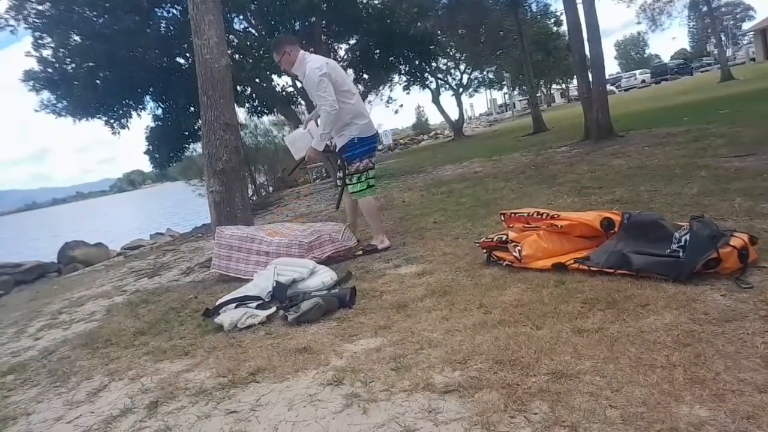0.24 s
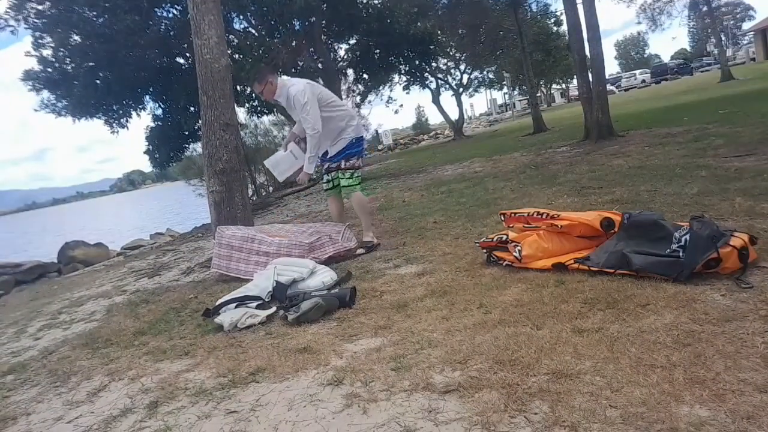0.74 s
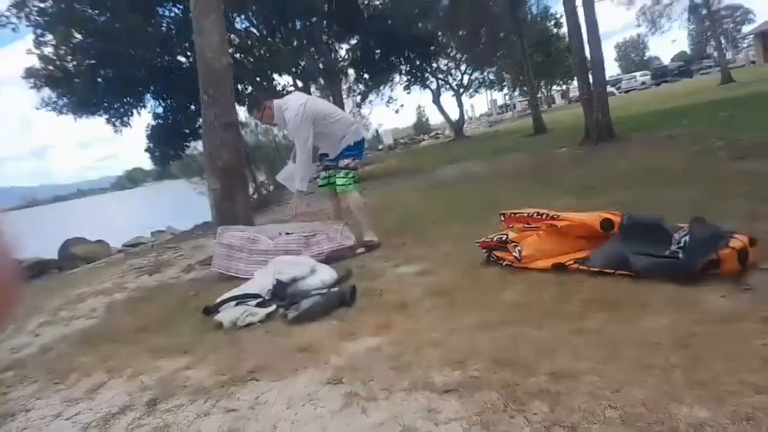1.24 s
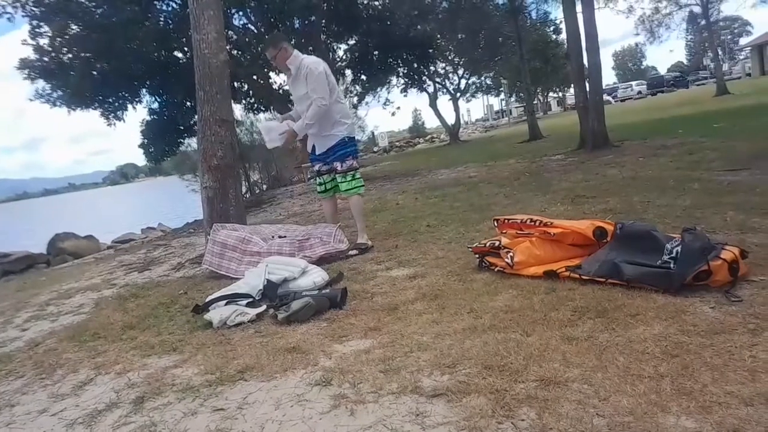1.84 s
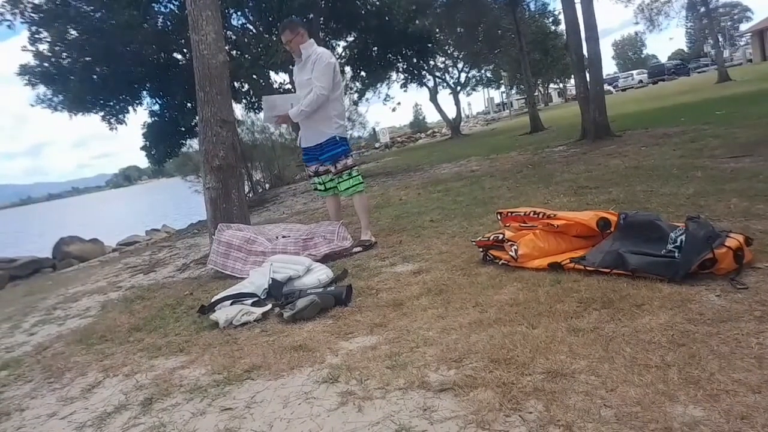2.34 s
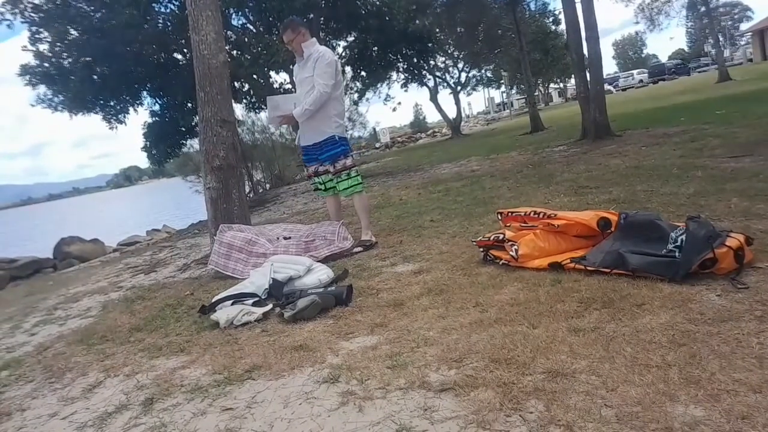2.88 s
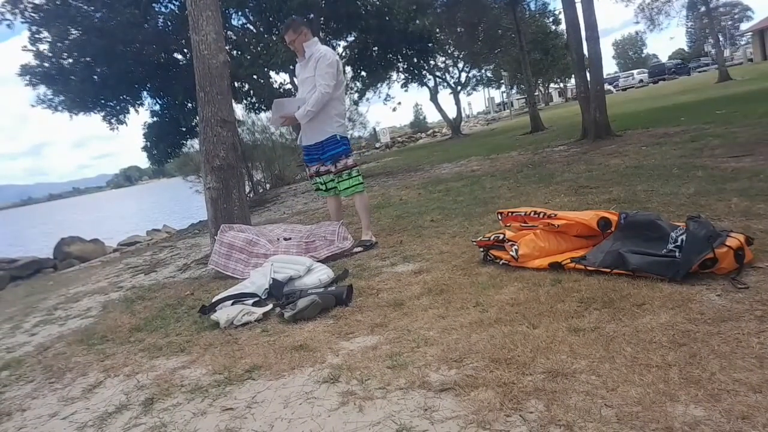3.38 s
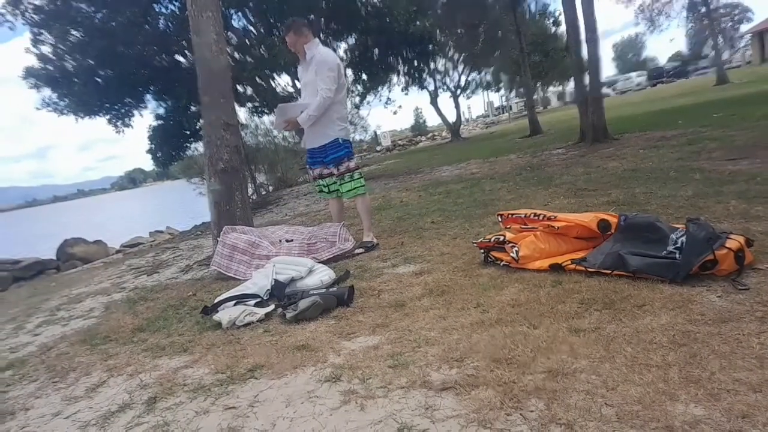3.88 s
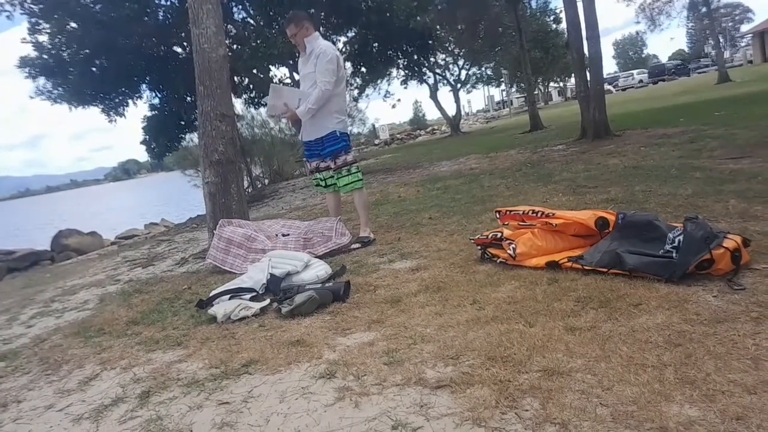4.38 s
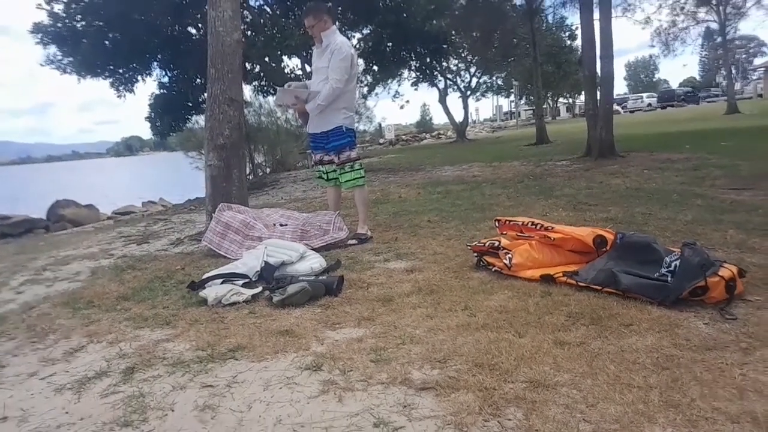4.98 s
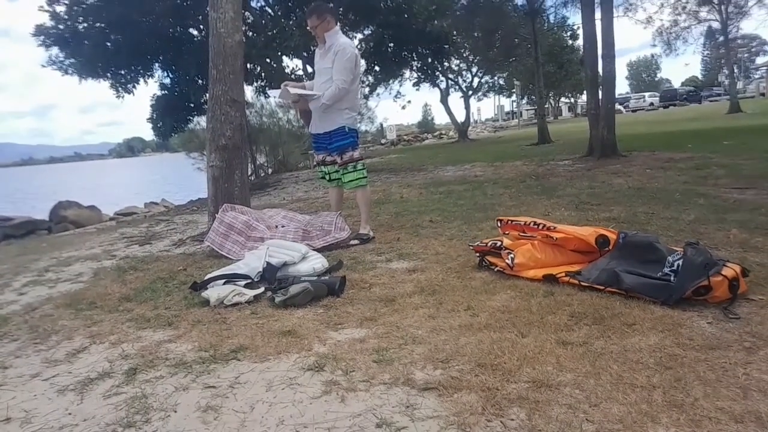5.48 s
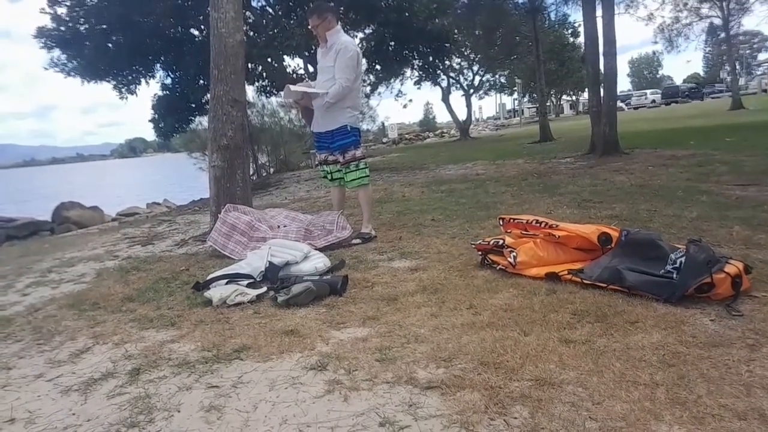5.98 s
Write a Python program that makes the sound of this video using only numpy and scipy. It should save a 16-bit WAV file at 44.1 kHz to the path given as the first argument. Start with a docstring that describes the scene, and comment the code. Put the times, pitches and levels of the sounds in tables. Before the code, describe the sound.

Close handling noise, with plastic clicks, thumps and one harsh scrape, over a quiet breezy riverbank with a chirping bird.

```python
"""Close knocks, clicks and rubs of a small camera being gripped and shifted on a grassy riverbank.
The plastic case cracks, rings and thumps right at its two microphone ports; skin sticks and slips
across it, and one hard scrape overloads the microphones. Behind the handling a bird repeats a rising
chirp in the trees, over light wind, hissing leaves, the wash of the river and the far hum of the shore."""
import sys
import numpy as np
from scipy import signal
from scipy.fft import rfft, irfft
from scipy.io import wavfile
from scipy.ndimage import uniform_filter1d

SR = 44100
rng = np.random.default_rng(int(sys.argv[2]) if len(sys.argv) > 2 else 0)


def bounce(signal):
    """Save signal as a 16-bit WAV file at the path given by the first command-line argument."""
    frames = np.transpose(np.atleast_2d(signal))
    limited = np.clip(frames, -1, 1)
    pcm = np.round(limited * 32767).astype(np.int16)
    wavfile.write(sys.argv[1], SR, pcm)


N = 274417
TIME = np.arange(N) / SR
HZ = np.fft.rfftfreq(N, 1 / SR)

# colour of the open air: f/Hz, level/dB
AIR_COLOUR = [(15, -56.5), (25, -20), (53, -0.5), (70, -4), (180, -15), (206, -18), (301, -13.5),
              (516, -13.5), (1160, -30), (1370, -28), (1790, -26), (2840, -24), (3080, -33), (3340, -24.5),
              (16000, -28.5)]
# how alike the ambience is at the two ports: f/Hz, correlation
AIR_LIKENESS = [(40, 0.74), (120, 0.95), (400, 0.9), (1000, 0.18), (2500, .25), (12000, 0.6)]
# level of the background hum, which ducks after the loud scrape and swells later: t/s, level/dB
BACKGROUND_LEVEL = [(0.0, -58), (0.36, -63.5), (1.23, -63.5), (1.33, -67), (3.69, -63.5), (3.88, -56),
                    (4.05, -50), (4.28, -57.5), (6.22, -53.5)]
# the case flexes the two ports differently: f/Hz, lead of the left port/rad
CASE_PHASE = [(40, 0.5), (90, -1), (200, -2.5), (400, 1.6), (700, 1.68), (1200, -1.33), (2500, -2.5),
              (4500, -1), (8000, -12)]


def gain_of(db):
    return 10 ** (np.asarray(db) / 20)


def unit_rms(x):
    return x / np.sqrt(np.mean(x ** 2) + 1e-20)


def as_blow(x):
    """Scales a short sound to the energy of 10 ms at level 1."""
    return x / np.sqrt(np.sum(x ** 2, -1, keepdims=True) / (SR / 100) + 1e-20)


def curve_at(points, hz):
    """Reads a curve along a logarithmic frequency axis."""
    f, value = np.transpose(points)
    return np.interp(np.log(hz + 1), np.log(f + 1), value)


def add(mix, start_s, sound):
    part = mix[..., max(round(start_s * SR), 0):][..., :sound.shape[-1]]
    part += sound[..., :part.shape[-1]]


def panned(side_db):
    """Left and right gains of mean power 1; positive leans left."""
    return unit_rms(gain_of([[side_db / 2], [-side_db / 2]]))


def below(hz, edge_hz, order=6):
    """Gain of a low-pass."""
    return 1 / np.sqrt(1 + (hz / edge_hz) ** (2 * order))


def above(hz, edge_hz, order=6):
    """Gain of the matching high-pass."""
    return np.sqrt(1 - below(hz, edge_hz, order) ** 2)


def wander(rate_hz, count=N):
    """Slow random drift of rms 1."""
    hz = np.fft.rfftfreq(count, 1 / SR)
    return unit_rms(irfft(rfft(rng.standard_normal(count)) * below(hz, rate_hz, order=2), count))


def tremble(samples, count):
    """Fast random unsteadiness: noise averaged over a few samples."""
    return unit_rms(uniform_filter1d(rng.standard_normal(SR // 2), samples))[:count]


def ports(pair, likeness, phase=0):
    """Partly alike spectra at the two ports, from two unrelated signals."""
    left, other = rfft(pair)
    right = likeness * left + np.sqrt(1 - likeness ** 2) * other
    return np.array([left, right * np.exp(-1j * phase)])


def patchy(x, depth_db, bins, frames=12):
    """Broad resonances come and go at random, alike at both ports."""
    spectra = signal.stft(x, nperseg=1024, noverlap=768)[2]
    patches = rng.standard_normal(spectra.shape[1:])
    for _ in range(2):
        patches = uniform_filter1d(uniform_filter1d(patches, bins, axis=0), frames, axis=1)
    spectra = spectra * gain_of(depth_db * unit_rms(patches))
    return signal.istft(spectra, nperseg=1024, noverlap=768)[1][:, :x.shape[-1]]


def background_swell():
    """How far the background level stands above its mean, in dB."""
    db = np.interp(TIME, *np.transpose(BACKGROUND_LEVEL))
    return db - db.mean()


def open_air(band):
    """One band of outdoor noise, spread across the stereo field."""
    # lean of the ambience: f/Hz, left minus right/dB
    balance = [(60, -15.5), (400, 2.5), (1200, -3), (3000, 18.5), (7000, 7), (14000, -3.5)]
    spectra = ports(rng.standard_normal((2, N)), curve_at(AIR_LIKENESS, HZ))
    colour_db = curve_at(AIR_COLOUR, HZ) + curve_at(balance, HZ) * np.array([[0.5], [-0.5]])
    return unit_rms(irfft(spectra * gain_of(colour_db) * band, N))


def shore_hum(lift_db=2.5, flicker_db=1.2):
    """The far shore: flickering low-mid noise, played at the background level."""
    hum = open_air(above(HZ, 200, order=2) * below(HZ, 990, order=2))
    background_db = np.interp(TIME, *np.transpose(BACKGROUND_LEVEL))
    return hum * gain_of(background_db + lift_db + flicker_db * wander(rate_hz=24))


def leaves(level_db=-67, follows=0.32):
    """A fine hiss of leaves that partly follows the background level."""
    return open_air(above(HZ, 2400, order=4)) * gain_of(level_db + follows * background_swell())


def bump_and_wind(breeze_db=-59, follows=0.76, lumps_db=3.7, surge_s=0.015):
    """Rumble at the ports: a bump of the case dies away, then a lumpy breeze blows with short puffs."""
    # a low bump of the case dying away at the start, then short puffs of wind: t/s, level/dB
    peaks = [(.005, -37), (.69, -48), (3.03, -51.5), (3.29, -51), (4.971, -35), (5.863, -41.5),
             (5.916, -39.5)]
    spectra = ports(rng.standard_normal((2, N)), likeness=0.33) * gain_of(curve_at(AIR_COLOUR, HZ))
    rumble = unit_rms(irfft(spectra * below(HZ, 130, order=2) * above(HZ, 30, order=2), N))
    breeze = gain_of(breeze_db + follows * background_swell() + lumps_db * wander(rate_hz=9.2))
    surges = sum(gain_of(db) / (1 + ((TIME - s) / surge_s) ** 2) ** 2 for s, db in peaks)
    return rumble * (breeze + surges)


def river(level_db=-64.5, period_s=2, crest_s=0.55, depth_db=3, follows=0.19):
    """Small waves make a patchy midrange wash that swells slowly and evenly."""
    ripples = patchy(rng.standard_normal((2, N)), depth_db=3.5, bins=4)
    spectra = ports(ripples, curve_at(AIR_LIKENESS, HZ))
    wash = unit_rms(irfft(spectra * above(HZ, 1000, order=3) * below(HZ, 1450, order=5), N))
    waves = np.cos(2 * np.pi * (TIME - crest_s) / period_s)
    return wash * gain_of(level_db + depth_db * waves + follows * background_swell())


def among_trees(direct, send, echoes_per_s=2500, build_s=0.0056):
    """A call from the left, plus the soft tail that trunks and leaves scatter from it."""
    # decay among the trees: f/Hz, t60/s
    decay = [(500, .4), (3000, 0.2), (6000, 0.65), (11000, 1)]
    echoes = rng.standard_normal((2, SR)) * (rng.random((2, SR)) < echoes_per_s / SR)
    hz, t, spectra = signal.stft(echoes, SR, nperseg=256)
    envelope = gain_of(-60 * t / curve_at(decay, hz)[:, None]) * (1 - np.exp(-t / build_s))
    tail = signal.istft(spectra * envelope, SR)[1]
    reverb = signal.fftconvolve(send[None], tail / np.linalg.norm(tail[0]), axes=1)[:, :N]
    return direct * panned(side_db=12) + reverb * panned(side_db=9)


def bird(direct_db=-4, facing=0.6, rasp=0.012, flutter_db=1.7, stop_s=0.002):
    """Raspy rising chirps of four harmonics, some broken off halfway; brighter ones arrive drier."""
    # calls: cue t/s, level/dB, pitch factor, overtone tilt/(dB/octave), cut-off after the cue/s
    chirps = [(.008, -53.5, 0.85, -14, 0.019), (.397, -50, 0.97, -3, .05), (0.459, -52.5, 0.9, -14, 0.029),
              (.686, -51.5, 0.83, -12, 0.02), (1.004, -49.5, 0.96, -0.5, 0.05),
              (1.693, -52.5, 0.98, -1, 0.046), (1.902, -56.5, 1, -6, 0.017), (2.341, -52.5, 1, -2, 0.057),
              (2.603, -62, 1.1, -6, .018), (2.959, -49.5, 0.94, -2, .05), (3.533, -51, 0.96, -2, 0.045),
              (4.043, -45, 1.01, 4.5, 0.048), (4.409, -55.5, .84, -4, 0.039), (4.659, -46, 1.02, 3, 0.058),
              (4.944, -62, 1.07, -5, .03), (5.215, -48, 0.93, -2, 0.051), (5.798, -47.5, 0.98, -5, .045),
              (5.945, -53.5, 0.97, -9.5, 0.02)]
    # shape of one chirp: t from the cue/s, f/Hz, level/dB
    gesture = [(-.02, 2380, -19), (-.009, 2650, -5), (0, 2760, 1.5), (.008, 3040, 5.5), (.02, 3640, -.5),
               (.03, 3800, 1.5), (.042, 3720, -9.5), (.052, 3350, -23)]
    # resonance of the beak: f/Hz, level/dB
    beak = [(2300, -15.5), (3000, -13), (3700, 0), (4700, -1.5), (5600, -1), (7000, -0.5), (7800, -6),
            (8500, -16.5), (9500, -32), (11200, -13), (14000, -34.5)]
    direct, send = np.zeros((2, N))
    at, pitch, shape_db = np.transpose(gesture)
    t = np.arange(at[0], at[-1], 1 / SR)
    for s, db, factor, tilt, end in chirps:
        hz = factor * np.interp(t, at, pitch) * (1 + rasp * tremble(50, len(t)))
        angle = 2 * np.pi * np.cumsum(hz) / SR
        voice = sum(gain_of(curve_at(beak, k * hz) + tilt * np.log2(k / 2)) * np.sin(k * angle)
                    for k in range(1, 5))
        gate = 0.5 - 0.5 * np.tanh((t - end) / stop_s)
        call = gain_of(db + np.interp(t, at, shape_db) + flutter_db * tremble(50, len(t))) * gate * voice
        add(send, s + at[0], call)
        add(direct, s + at[0], gain_of(direct_db + facing * tilt) * call)
    return among_trees(direct, send)


def wavering_tone(length_s, hz, waver, fall=0):
    """A short tone that swells and fades, its pitch unsteady and perhaps drooping."""
    t = np.arange(0, length_s, 1 / SR)
    pitch = hz * (1 - fall * (t / length_s) ** 2 + waver * tremble(120, len(t)))
    return np.sin(np.pi * t / length_s) * np.sin(2 * np.pi * np.cumsum(pitch) / SR)


def far_whistles():
    """A few faint tones carry through the trees."""
    # far tones: t/s, length/s, f/Hz, level/dB, waver/share of pitch, final fall/share of pitch
    whistles = [(0.121, 0.017, 1167, -46, 0.038, 0), (.655, 0.067, 3010, -57.5, 0.036, .08),
                (0.755, .12, 549.4, -52.5, 0.11, 0.023), (0.724, 0.097, 2600, -56, 0.081, 0.14),
                (2.729, 0.017, 1436, -54, .02, 0.017), (2.805, 0.014, 1507, -55, .023, 0.0099),
                (5.703, .048, 7700, -62, .005, 0.00083), (5.831, 0.39, 540, -54, 0.16, 0.003),
                (5.87, .094, 7700, -67, .005, 0), (6.102, 0.1, 7400, -64, 0.0094, 0.017)]
    out = np.zeros(N)
    for s, length, hz, db, waver, fall in whistles:
        add(out, s, gain_of(db) * wavering_tone(length, hz, waver, fall))
    return among_trees(direct=out, send=out)


def crack(tilt, side_db, fade_s, rattle_db, rattle_s):
    """A snap of plastic, different at each port: a sharp burst, then a rattle, weaker in bright snaps."""
    # colour of the snap: f/Hz, level/dB
    colour = [(500, -22.5), (1100, -4.5), (1700, -4.5), (2500, 1), (3300, -3), (4200, -1), (6000, -1.5),
              (9000, -7), (13000, -11), (16000, -16.5)]
    t, hz = np.arange(2048) / SR, np.fft.rfftfreq(2048, 1 / SR)
    rattle = gain_of(rattle_db - 0.8 * tilt - 2.5) * np.exp(-t / rattle_s)
    burst = rng.standard_normal((2, len(t))) * (np.exp(-t / fade_s) + rattle)
    colour_db = curve_at(colour, hz) + tilt * np.log2(np.maximum(hz, 1500) / 4000)
    log_gain = np.log(gain_of(np.r_[colour_db, colour_db[-2:0:-1]]))
    minimum_phase = np.exp(np.conj(signal.hilbert(log_gain)))[:len(hz)]  # keeps the attack sharp
    return as_blow(irfft(rfft(burst) * minimum_phase)) * panned(side_db)


def clicks():
    """The plastic snaps cleanly, with no ring or thump."""
    # clicks of the case: t/s, level/dB, tilt/(dB/octave), left minus right/dB
    snaps = [(0.3451, -56.5, -6.5, 10), (1.0789, -39.5, 0.5, 14), (1.2224, -15, -4, -8.5),
             (1.375, -55.5, 9, -4), (1.5038, -48, 3.5, 14), (1.556, -37, -1, 5), (1.5609, -38.5, 2.5, -3),
             (1.5763, -38, -1, -3), (1.6233, -38, 6, 0), (1.666, -44, 18, 2.5), (1.7, -51.5, 1, 12.5),
             (1.7674, -50, 6.5, 7), (1.79, -30.5, -12.5, 5.5), (1.8013, -18, 5, 3),
             (1.8193, -31.5, -6.5, 13), (1.851, -44.5, 2, 0), (1.9512, -47, -4, 1),
             (1.999, -41.5, 8.5, 5.5), (2.063, -52, -0.5, 10), (2.1096, -30.5, 1.5, 11),
             (2.1526, -28, 2.5, 13.5), (2.1707, -48, 2.5, -3.5), (3.9308, -27, -0.5, 2),
             (3.988, -42.5, 11, 9), (4.2934, -43, 12.5, -3), (4.3823, -50.5, 9.5, 6.5),
             (5.1478, -43, 1, -1), (5.5652, -35.5, 2, 0), (5.594, -32, 1, 17), (5.6472, -34, -10, -8)]
    out = np.zeros((2, N))
    for s, db, tilt, side_db in snaps:
        add(out, s, gain_of(db) * crack(tilt, side_db, fade_s=0.00071, rattle_db=-23, rattle_s=0.0047))
    return out


def finger_pressure(rise_s, hold_s, release_s):
    """One stroke builds, holds and dies away."""
    t = TIME[:SR // 2]
    return np.clip(t / rise_s, 0, 1) * np.exp(-np.maximum(t - rise_s - hold_s, 0) / release_s)


def friction(strokes, colour, release_s, slips_per_s, spread_db, smooth, side_db, judder_db, patchy_db):
    """Skin sticks and slips on the case: dense tiny clicks sound as rumble, body and hiss."""
    # how alike the rubbing is at the two ports: f/Hz, correlation
    likeness = [(60, 0.3), (250, 0.97), (500, 0.97), (1200, 0.7), (2200, 0.77), (12000, 0.36)]
    starts, rises, holds, db, rumble_db, hiss_db, tilt = np.transpose(strokes)
    count = SR * int(np.ceil(starts[-1] - starts[0]))
    hz, shape = np.fft.rfftfreq(count, 1 / SR), (2, count)
    sizes = gain_of(spread_db * np.minimum(rng.exponential(1, shape), 4)) * rng.choice([-1, 1], shape)
    slips = unit_rms(sizes * (rng.random(shape) < slips_per_s / SR))
    grain = patchy(slips + smooth * rng.standard_normal(shape), patchy_db, bins=9)
    grain = grain * gain_of(judder_db * wander(rate_hz=59, count=count))
    spectra = ports(grain, curve_at(likeness, hz), curve_at(CASE_PHASE, hz))
    spectra *= gain_of(curve_at(colour, hz))
    rumble = unit_rms(irfft(spectra * below(hz, 210, order=3) * above(hz, 48, order=3)))
    body = unit_rms(irfft(spectra * above(hz, 340, order=3) * below(hz, 1420, order=12)))
    hiss = unit_rms(irfft(spectra * above(hz, 1900)))
    low_hiss = irfft(rfft(hiss) * below(hz, 5900, order=2) ** 2)
    pressure = np.zeros((len(starts), count))
    for row, s, rise, hold in zip(pressure, starts, rises, holds):
        add(row, s - starts[0], finger_pressure(rise, hold, release_s))

    def envelope(stroke_db):  # overlapping strokes add in power
        return np.sqrt(gain_of(stroke_db) ** 2 @ pressure ** 2)

    out = np.zeros((2, N))
    add(out, starts[0], rumble * envelope(db + rumble_db) + body * panned(side_db) * envelope(db))
    add(out, starts[0], low_hiss * envelope(db + hiss_db - 0.5 * tilt))
    add(out, starts[0], (hiss - low_hiss) * envelope(db + hiss_db + tilt))
    return out


def scrape():
    """A finger drags hard over the ports."""
    # hard strokes: t/s, rise/s, hold/s, level/dB, relative rumble/dB, relative hiss/dB, hiss tilt/dB
    strokes = [(1.065, 0.01, 0.012, -41.5, 2.5, -6.5, 6), (1.097, 0.0015, 0.026, -25, 6.5, -11.5, -5),
               (1.118, 0.026, .022, -13.5, -9, -2.5, 1), (1.168, .006, 0.02, -16, -8, -5.5, -1),
               (1.198, .004, 0.03, -3, -20, -13, -0.5), (1.245, 0.0055, 0.039, -40, 14, -2.5, -2),
               (1.29, 0.0085, 0.024, -46.5, 12.5, 3.5, 4)]
    # colour of hard friction: f/Hz, level/dB
    colour = [(21, -38), (35, 2), (114, -10), (239, -6.5), (309, -19.5), (420, -9), (587, -9), (778, -15),
              (1110, -12), (1910, -9.5), (3620, -23), (4440, -14.5), (6520, -30.5), (11800, -28.5),
              (16000, -40.5)]
    return friction(strokes, colour, release_s=0.007, slips_per_s=2200, spread_db=2.5, smooth=0.4,
                    side_db=-1.5, judder_db=1.05, patchy_db=1.5)


def shell_ring(tilt, grip=0.92, rise_s=0.00072, travel_s=0.0015, wall_hz=1500):
    """The case rings for a few cycles, shortened by the grip; low bending waves arrive later."""
    # modes of the case: f/Hz, level/dB, t60 before the grip/s
    modes = [(251, 0, 0.035), (402, -0.5, 0.044), (516.3, 0, 0.035), (649, 1.5, 0.026), (958, -4, 0.024),
             (1101, 9.5, 0.012), (1243, -13.5, 0.0053), (1374, -9, 0.043)]
    t, ring = np.arange(4096) / SR, 0
    top_hz = modes[-1][0]
    for hz, db, t60 in modes:
        age = np.maximum(t - travel_s * (np.sqrt(top_hz / hz) - 1), 0)
        phase = rng.standard_normal() - np.array([[0], [curve_at(CASE_PHASE, hz)]])
        level = gain_of(db + tilt * np.log2(hz / 750) - 60 * age / (t60 * grip))
        ring = ring + level * (1 - np.exp(-age / rise_s)) * np.sin(2 * np.pi * hz * age + phase)
    return as_blow(signal.sosfilt(signal.butter(2, wall_hz, fs=SR, output="sos"), ring))


def thump(end_hz, sweep=1.7, settle_s=0.0066, rise_s=0.0033, fade_s=0.015, apart_rad=2.4):
    """The slow bending waves come last: a falling boom that pushes one port and pulls the other."""
    t = np.arange(SR // 6) / SR
    angle = 2 * np.pi * np.cumsum(end_hz * (1 + sweep * np.exp(-t / settle_s))) / SR
    envelope = (1 - np.exp(-t / rise_s)) * np.exp(-t / fade_s)
    return as_blow(np.sin(angle + np.array([[0], [apart_rad]])) * envelope)


def knocks(ring_lead_s=0.0011, crack_lead_s=0.0004):
    """Each knock rings the shell, cracks and thumps."""
    # blows on the case: t/s, ring level/dB, ring tilt/(dB/octave), thump level/dB, final thump f/Hz,
    # crack level/dB, crack tilt/(dB/octave), crack left minus right/dB
    blows = [(1.0961, -12.5, 2.5, -33, 89, -20, -3.5, -3.5), (1.239, -13.5, -19, -5.5, 90.6, -26, -5, 3),
             (1.263, -42, -15, -10, 68.2, -35, -9, 14), (1.5, -39.5, -4.5, -44, 110, -34, 5, 2.5),
             (1.5797, -33.5, -7, -48, 128, -37.5, -9, 2), (1.6535, -32.5, 21, -37, 90, -31.5, -2, 5.5),
             (1.813, -27, 0.5, -33, 99.4, -23, 3, -12), (1.964, -53, -11, -30.5, 78.5, -49.5, -21, 5),
             (2.16, -40.5, -2.5, -58, 97, -54, -5.5, 8), (2.2221, -41, 1, -49, 107, -48, -1.5, -1),
             (2.242, -37.5, 0.5, -30, 105.5, -38, -9, 4), (2.269, -25, -11, -23, 123, -32, -5, 12),
             (2.337, -35.5, -4.5, -48, 138, -39.5, -2.5, 9), (3.913, -12.5, 5, -7.5, 131, -43, -8, 19),
             (3.929, -23, 1, -11.5, 77.6, -32.5, -5, -11), (3.97, -26.5, -1, -41, 76, -26.5, -8.5, 10),
             (4.63, -39.5, -3.5, -52, 80, -72, 0, 2), (4.7298, -13.5, -5.5, -3.5, 90, -24.5, -6.5, 0.5),
             (5.0487, -28, -2.5, -31, 144.4, -35, -14.5, -3), (5.0632, -40.5, 11, -41, 95, -48, -9, -9),
             (5.2646, -42.5, 2, -46.5, 90, -42.5, -4.5, 15), (5.3916, -35, 2, -47, 88.6, -35.5, -1, 4),
             (5.5289, -24.5, -1, -21, 90, -29.5, -3.5, 0.5), (5.5876, -14.5, 1, -20, 121, -20, -1, 1)]
    out = np.zeros((2, N))
    for s, ring_db, ring_tilt, thump_db, thump_hz, crack_db, crack_tilt, side_db in blows:
        add(out, s - ring_lead_s, gain_of(ring_db) * shell_ring(ring_tilt) * panned(side_db=1.5))
        add(out, s, gain_of(thump_db) * thump(thump_hz) * panned(side_db=0.5))
        snap = crack(crack_tilt, side_db, fade_s=0.00012, rattle_db=-21.5, rattle_s=0.0071)
        add(out, s - crack_lead_s, gain_of(crack_db) * snap)
    return out


def skin_squeaks():
    """Now and then the skin squeaks on the plastic."""
    # squeaks: t/s, length/s, f/Hz, level/dB
    squeaks = [(1.195, 0.046, 1081, -6.5), (1.286, 0.045, 2660, -43.5), (1.295, 0.045, 837, -41.5),
               (4.893, 0.015, 547, -40)]
    out = np.zeros((2, N))
    for s, length, hz, db in squeaks:
        add(out, s, gain_of(db) * wavering_tone(length, hz, waver=0.032))
    return out


def grip_ticks(from_s=1.48, to_s=2.2, per_s=26, level_db=-57.5, spread_db=2.5):
    """The case ticks faintly and unevenly as the fingers find a new grip."""
    out = np.zeros((2, N))
    slots = np.arange(from_s, to_s, 1 / per_s)
    for s, (late, size) in zip(slots, rng.random((len(slots), 2))):
        tick = crack(tilt=6, side_db=5, fade_s=0.0007, rattle_db=-20, rattle_s=0.003)
        add(out, s + late / per_s, gain_of(level_db + spread_db * (2 * size - 1)) * tick)
    return out


def rubs():
    """Fingers rub and slide lightly over the case."""
    # light strokes: t/s, rise/s, hold/s, level/dB, relative rumble/dB, relative hiss/dB, hiss tilt/dB
    strokes = [(1.497, .006, 0.0084, -49, 10.5, 1, 8.5), (1.553, 0.0079, 0.024, -42, -3, -2.5, 4),
               (1.59, 0.018, 0.088, -63.5, 13, 2, 5), (1.8, 0.007, 0.028, -45, 14, -5.5, 1),
               (1.96, 0.013, 0.013, -62.5, 26.5, 9, 9), (2.155, 0.0034, 0.0061, -58, 19.5, -8, 3),
               (2.225, 0.013, 0.043, -53.5, 18, 4.5, 5), (2.34, 0.009, 0.022, -59.5, 17.5, 8, 7),
               (3.055, 0.022, 0.019, -48.5, -11, -4, 5.5), (3.09, 0.044, .14, -68, -2.5, 7.5, 7),
               (3.57, .04, 0.056, -53.5, -4.5, 2.5, 2), (3.687, 0.0044, 0.021, -45.5, 14, 2, 3.5),
               (3.71, 0.013, 0.23, -51, 1, 2, 10), (3.8, 0.022, 0.12, -42.5, 5, -10.5, -6),
               (3.93, 0.0049, 0.063, -42.5, 12.5, 2, 0), (3.962, 0.0049, 0.0036, -36.5, -4, -8, -4),
               (4.035, 0.042, 0.019, -39, -3, -3.5, 0.5), (4.11, 0.017, 0.15, -49, -1, -4, -1),
               (4.2, 0.021, 0.038, -46.5, -15, -2.5, -6), (4.56, 0.015, 0.061, -48.5, 0, -19, -6),
               (4.662, 0.0085, 0.074, -55.5, 20.5, -5, 1), (4.735, 0.0075, 0.054, -34, 2.5, -10, -3.5),
               (4.83, .012, .02, -61, 21, 1, -9), (4.885, 0.0088, 0.0096, -54.5, 2, 1, 7),
               (5.05, 0.012, .008, -42.5, 0, -8.5, 2), (5.122, 0.015, 0.0087, -33.5, 2, -9.5, -0.5),
               (5.18, 0.022, 0.28, -56, -8, -4.5, 3), (5.5, 0.027, 0.15, -40, 6, -8, 3),
               (5.59, 0.006, 0.0093, -32.5, 2, -6.5, 5), (5.635, 0.0043, 0.011, -42, -2, -1, 4)]
    # colour of light friction: f/Hz, level/dB
    colour = [(21, -12), (35, 9), (86, 5), (334, -12.5), (431, -0.5), (529, -14), (862, -14), (1170, -9.5),
              (1720, -16), (2730, -13.5), (3270, -20), (5180, -25), (10100, -33), (14400, -38.5),
              (16000, -46)]
    return friction(strokes, colour, release_s=0.02, slips_per_s=1800, spread_db=3.5, smooth=0.65,
                    side_db=0, judder_db=2.5, patchy_db=2.5)


def scene():
    """Handling noise right at the ports, with the riverbank behind it."""
    handling = knocks() + clicks() + grip_ticks() + scrape() + rubs() + skin_squeaks()
    return handling + shore_hum() + leaves() + bump_and_wind() + river() + bird() + far_whistles()


def record(dry, low_cut_hz=32, top_hz=16300):
    """The microphones lose the deepest bass, flatten peaks at full scale and cut the highest treble."""
    heard = signal.sosfilt(signal.butter(2, low_cut_hz, "high", fs=SR, output="sos"), dry)
    clipped = heard / (1 + heard ** 8) ** (1 / 8)
    band_limit = signal.firwin(255, top_hz, window=("kaiser", 7), fs=SR)
    return signal.oaconvolve(clipped, band_limit[None], "same")


dry = scene()
out = record(dry)
bounce(out)
```